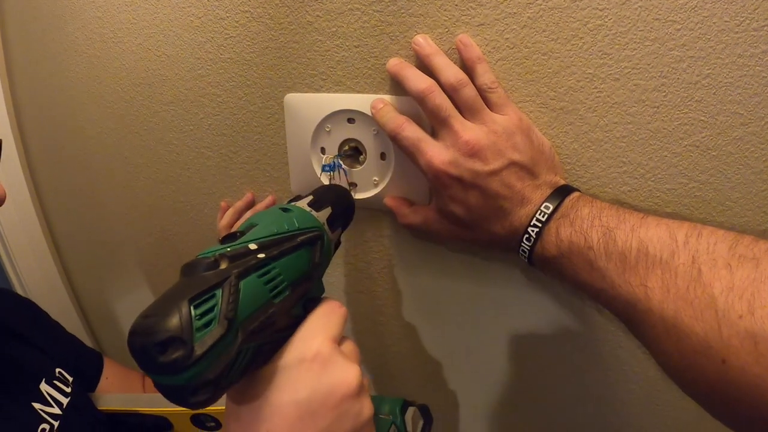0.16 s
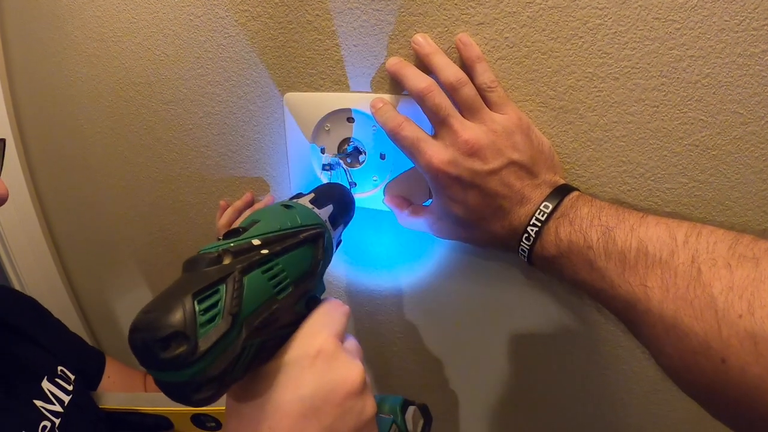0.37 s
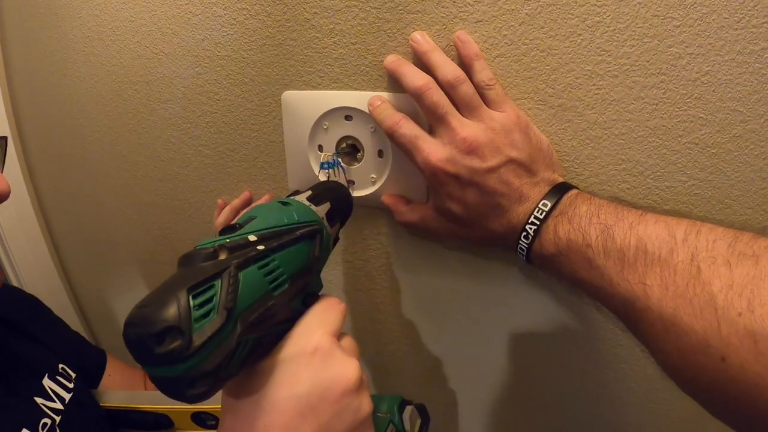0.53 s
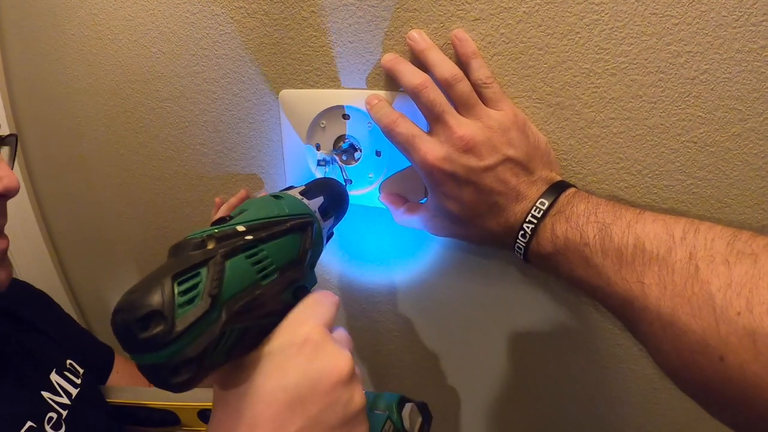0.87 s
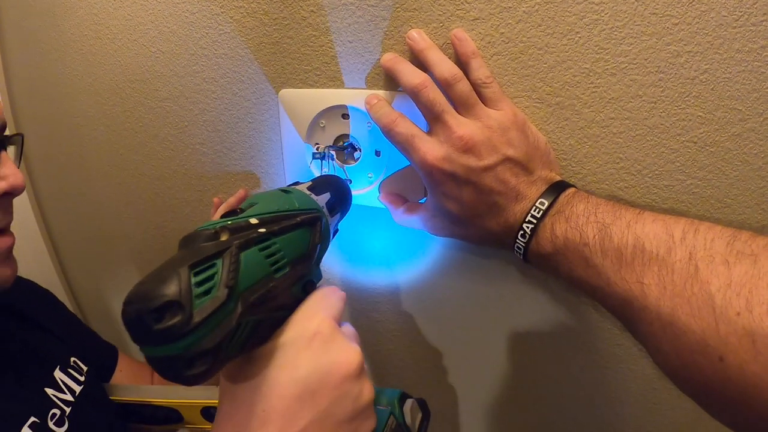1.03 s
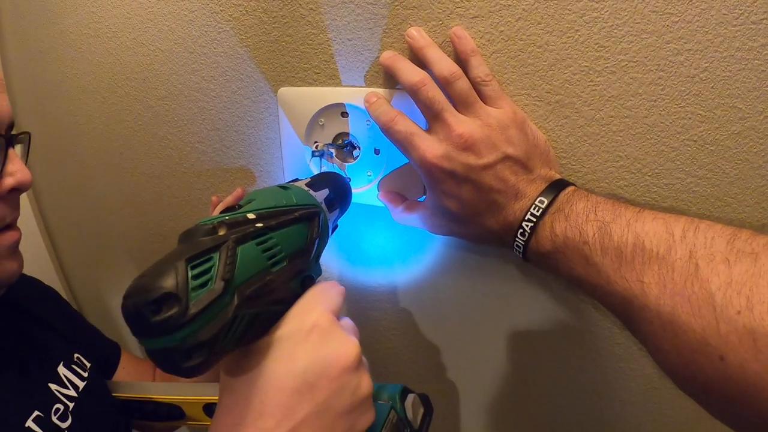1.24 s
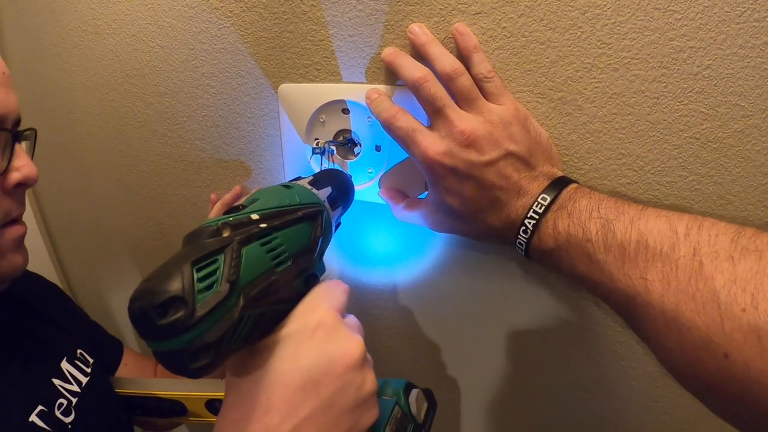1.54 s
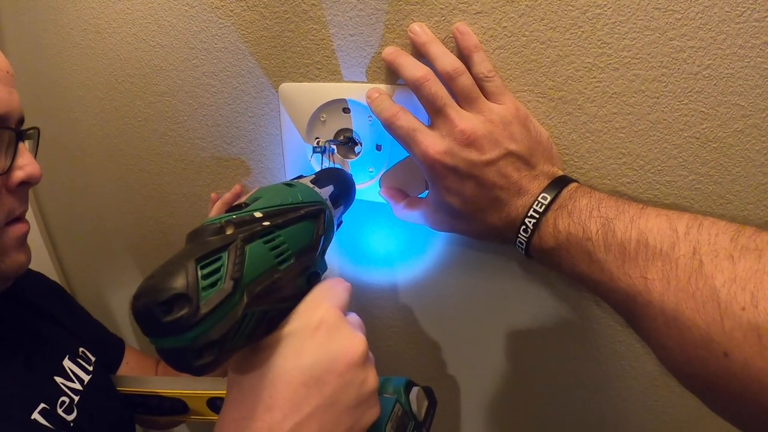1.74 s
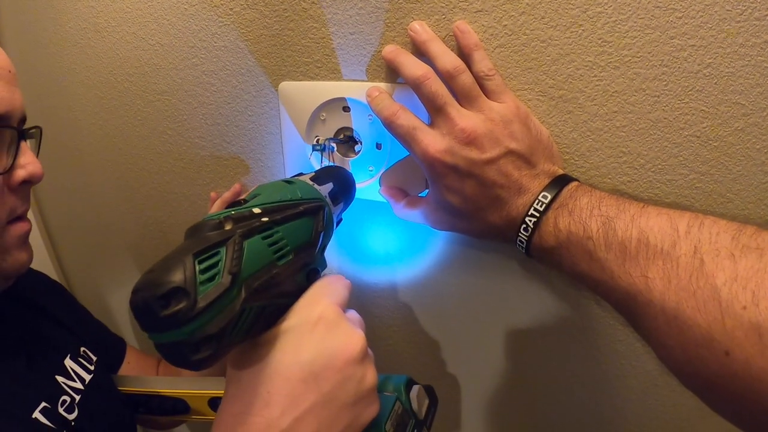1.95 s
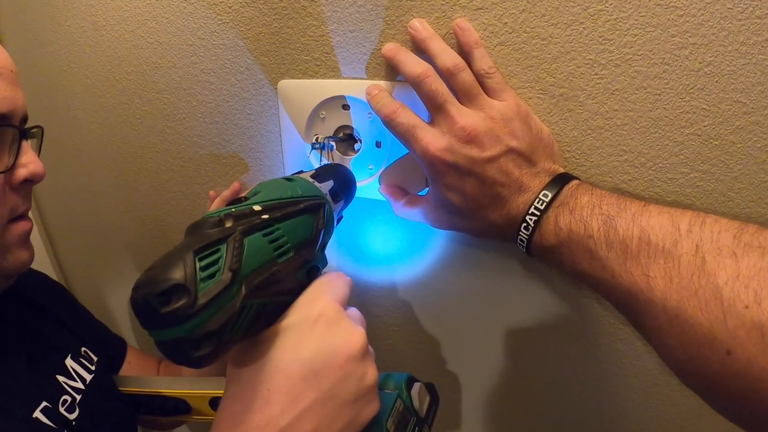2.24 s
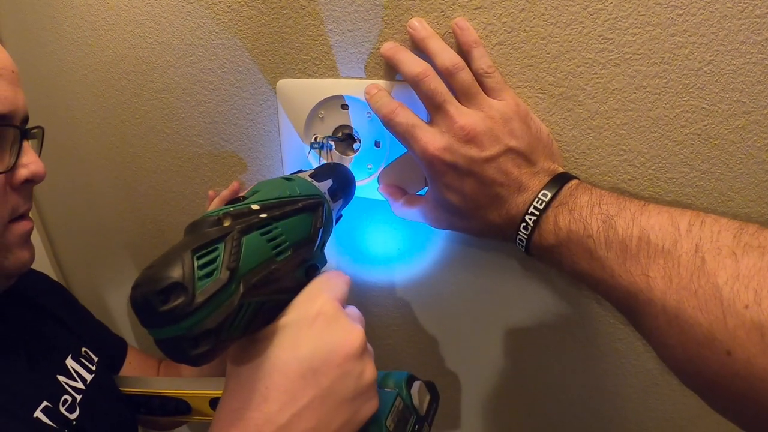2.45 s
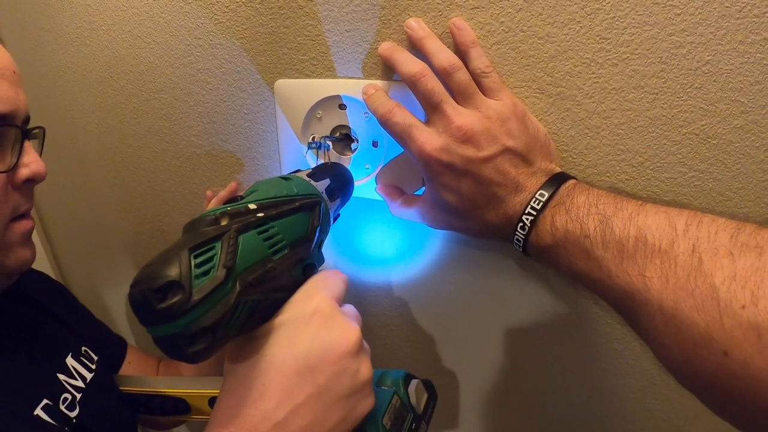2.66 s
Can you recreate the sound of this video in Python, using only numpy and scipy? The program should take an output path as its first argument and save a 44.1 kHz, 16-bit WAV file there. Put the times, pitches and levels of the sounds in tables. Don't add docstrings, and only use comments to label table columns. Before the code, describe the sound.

A power drill pulses in short bursts with clutch clacks, then winds up into a steady whine

```python
import sys
import numpy as np
from scipy import signal
from scipy.fft import rfft, irfft, next_fast_len
from scipy.io import wavfile
from scipy.ndimage import map_coordinates

SR = 44100
rng = np.random.default_rng(int(sys.argv[2]) if len(sys.argv) > 2 else 0)


def invert_db(x):
    u = np.asarray(x, float) / 20
    return 10 ** u


def int16_out(signal):
    q = np.round(np.clip(np.atleast_2d(signal).T, -1, 1) * 32767)
    wavfile.write(sys.argv[1], SR, q.astype(np.int16))


N = 123479
T = np.arange(N) / SR


def unit(x):
    return x / np.sqrt(np.mean(x ** 2) + 1e-20)


def along(points, hz):
    f, v = np.transpose(points)
    return np.interp(np.log(hz + 1), np.log(f + 1), v)


def wobble(rate):
    coarse = T[::32]
    knots = rng.standard_normal(int(N * rate / SR) + 4)
    return np.interp(T, coarse, map_coordinates(knots, [coarse * rate]))


def filtered(x, response):
    m = next_fast_len(x.shape[-1] + SR // 4)
    return irfft(rfft(x, m) * response(np.fft.rfftfreq(m, 1 / SR)), m)[..., :x.shape[-1]]


def coloured_noise(colour):
    return unit(filtered(rng.standard_normal(N), lambda f: invert_db(along(colour, f))))


def resonant(modes, f):
    return sum((-1) ** k * invert_db(db) * 1j * f * w / (c * c - f * f + 1j * f * w)
               for k, (c, w, db) in enumerate(modes))


def burst(events, t60, colour):
    gain = 0
    for s, db in events:
        attack = np.clip((T - s) / .0006, 0, 1)
        gain = gain + attack * invert_db(db - 60 * np.abs(T - s) / t60)
    return gain * coloured_noise(colour)


# (frequency [Hz], level [dB per Hz])
FLOOR = [(15, -35), (25, -6), (118, -5.5), (224, -19), (344, -34), (1630, -35.5), (6000, -53), (15000, -75)]


def quiet_floor():
    noise = rng.standard_normal(N) + 0.29 * rng.standard_normal((2, N))
    return invert_db(-52) * unit(filtered(noise, lambda f: invert_db(along(FLOOR, f))))


SIDE = np.array([[.5], [-.5]])
# (frequency [Hz], left over right [dB])
LEFT_DB = [(40, 1.5), (290, 1.1), (640, .6), (1400, 1.1), (3100, 2.4), (6500, 1), (9000, -3.5),
           (15000, -4.5)]
# (frequency [Hz], lead [radians])
LEAD = [(0, 0.23), (1400, -0.32), (5500, -0.71), (15000, -0.42)]


def tilt(f):
    return invert_db(SIDE * along(LEFT_DB, f)) * np.exp(1j * SIDE * along(LEAD, f))


# (frequency [Hz], correlation [0..1])
ALIKE = [(400, 1), (700, .98), (1500, .92), (3000, .8), (6000, .55), (12000, .15)]


def spread(f):
    return np.arccos(np.clip(along(ALIKE, f), -1, 1)) / 2


def ports(x):
    length = SR // 8
    near = rng.standard_normal(length) * invert_db(-60 * T[:length] / 0.14)
    echo = signal.fftconvolve(x, near / np.linalg.norm(near))[:N]
    direct = filtered(x, lambda f: tilt(f) * np.cos(spread(f)))
    return direct + filtered(echo, lambda f: 2 * SIDE * tilt(f) * np.sin(spread(f)))


# (frequency [Hz], t60 [s])
ROOM = [(100, 0.5), (500, 0.49), (1800, 0.25), (5000, 0.26), (12000, 0.027)]
# (frequency [Hz], level [dB])
WET = [(100, -17), (220, -19.5), (500, -14), (1800, -14), (5000, -13.5), (12000, -6.5)]


def room(x):
    hz, t, z = signal.stft(rng.standard_normal((2, SR // 2)), SR, nperseg=256)
    u = spread(hz)[:, None]
    common, apart = np.cos(u) * z[0], np.sin(u) * z[1]
    decay = invert_db(-60 * t / along(ROOM, hz)[:, None])
    tail = signal.istft(np.array([common + apart, common - apart]) * decay, SR, nperseg=256)[1]
    tail = filtered(tail / np.linalg.norm(tail[0]), lambda f: tilt(f) * invert_db(along(WET, f)))
    delayed = np.pad(x, (200, 0))
    return signal.fftconvolve(delayed[None], tail, axes=1)[:, :N]


# (time [s], level [dB])
RUSTLE = [(.7, -54.5), (.8, -62), (.848, -57), (.858, -52), (.87, -54), (.9, -56), (.91, -80)]


def rustle():
    noise = coloured_noise([(200, 1), (1200, 2), (2000, -10), (6000, -23), (15000, -62)])
    return noise * invert_db(np.interp(T, *np.transpose(RUSTLE), -120, -120) + 2 * wobble(39))


# (time [s], peak level [dB])
CLICKS = [
    (0.2008, -34.5),
    (0.4228, -30),
    (0.7165, -51),
    (0.854, -55),
    (0.9015, -25),
]
# (time [s], peak level [dB])
CONTACTS = [
    (0.3975, -52),
    (.868, -50),
]


def trigger():
    clicks = burst([(s, db - 7) for s, db in CLICKS], 0.012,
                   [(1000, -7), (4000, 2), (9500, 0), (15000, -20)])
    return clicks + burst(CONTACTS, 0.013, [(3000, -20), (5200, 0), (6500, -2), (8500, -25)])


# (time [s], pitch [Hz], level [dB])
WHISTLE = [
    [(0, 6490, -38), (.03, 6490, -40), (.045, 6490, -60)],
    [(0, 4320, -48), (.09, 4320, -48), (.1, 4320, -65)],
    [(.399, 5500, -75), (.408, 5630, -61), (.42, 5750, -65), (.428, 6050, -51), (.5, 6080, -53),
     (.508, 6900, -56), (.53, 7010, -61), (.575, 7010, -59), (.59, 7010, -70)],
    [(.868, 5600, -75), (.877, 5650, -62), (.886, 5850, -62), (.891, 6600, -49), (.9, 6500, -53),
     (.945, 6550, -44), (.96, 6550, -60)],
]


def controller():
    total = 0
    for rows in WHISTLE:
        s, hz, db = np.transpose(rows)
        turn = 2 * np.pi * np.cumsum(np.interp(T, s, hz)) / SR
        level = invert_db(np.interp(T, s, db, -120, -120) + 3 * wobble(100))
        total = total + np.sqrt(2) * level * np.sin(turn + .7 * wobble(150))
    return total


# (time [s], peak level [dB], ring [Hz])
TICKS = [(0.4422, -43, 9460), (0.4507, -40, 9090), (0.4609, -41, 9300), (0.4754, -42, 8600),
         (0.4854, -51, 8410), (0.4946, -40, 9250), (0.508, -32, 8550), (0.5164, -44, 9350),
         (0.533, -43, 9500), (0.5509, -30.5, 8520), (0.5784, -35, 9450), (0.5888, -33, 8990),
         (0.6218, -46, 9360), (0.6284, -46, 8600), (0.6404, -47, 9000)]


def brush_ticks():
    ticks_per_s, t60_s = 340, .005
    sparse = (rng.random(N) < ticks_per_s / SR) * invert_db(4.1 * rng.standard_normal(N))
    faint = unit(filtered(sparse, lambda f: resonant([(8900, 820, 0)], f)))
    clear = 0
    for s, db, hz in TICKS:
        decay = invert_db(db - 60 * np.abs(T - s) / t60_s) * (T >= s)
        clear = clear + decay * np.sin(2 * np.pi * hz * (T - s))
    crawling = (T > SLOW[1][0] + .01) * (T < SLOW[-2][0])
    return clear + invert_db(-56.5) * faint * crawling


# (frequency [Hz], width [Hz], level [dB])
WALL = [(44, 16, -4), (92, 18, -3), (120, 14, 2), (180, 30, -2), (225, 40, -7), (335, 50, -16)]


def wall(f):
    return resonant(WALL, f) / (1 + 1j * f / 378) ** 2


def judder():
    start, settle_s = RUN[1][0] + .01, .17
    force = invert_db(-41 + 19 * np.exp(-np.abs(T - start) / settle_s)) * (T > start)
    slow = (T > SLOW[0][0]) * (T < SLOW[-1][0])
    force = force + invert_db(-21.5) * (slow + 0.22 * (T < FIRST[-3][0]))
    noise = rng.standard_normal(N) * invert_db(0.56 * wobble(24.4))
    return filtered(force * noise, wall) / np.std(filtered(noise, wall))


# (time [s], clack level [dB], thud level [dB])
RATCHET = [(.4235, -50, -22), (0.431, -27, -19.5), (0.484, -27, -18), (0.523, -26, -15), (0.557, -25, -16),
           (0.592, -26.5, -16.5), (0.636, -24.5, -15), (0.689, -51, -25), (0.916, -21, -18),
           (.927, -20, -22), (.946, -20, -21), (.981, -21, -22), (.999, -17, -18), (1.041, -22, -22)]
# (frequency [Hz], level [dB])
CLACK = [(300, -7), (750, -1), (1400, 1.5), (2150, 2.5), (2600, -9), (5000, -28), (15000, -55)]
# (frequency [Hz], width [Hz], level [dB])
CLUTCH = [(700, 350, 0), (1450, 450, 0), (2050, 400, -1)]


def ratchet():
    blows, snaps = np.zeros(N), np.zeros(N)
    for s, clack_db, thud_db in RATCHET:
        snaps[round(s * SR)] = invert_db(clack_db + 19)
        blows[round(s * SR)] = invert_db(thud_db + 54.5)
    snap = filtered(snaps, lambda f: resonant(CLUTCH, f) / (1 + 1j * f / 2800) ** 2)
    clack = burst([(s, db - 8) for s, db, _ in RATCHET], .045, CLACK)
    return filtered(blows, wall) + snap + clack


# (frequency [Hz], width [Hz], level [dB])
HOUSING = [(1130, 420, 2), (1510, 205, 3.5), (1966, 360, 5), (3490, 660, 3.5), (4317, 180, 7.5),
           (8430, 156, -19), (8660, 1250, 6)]


def gear_hiss(turn, speed, gears, gate):
    teeth = rng.standard_normal(N) * np.exp(gate * np.cos(turn + 0.59))
    teeth = teeth * invert_db(0.68 * wobble(60) + 0.18 * wobble(26))

    def body(f):
        peaks = sum(db / (1 + (2 * (f - c) / w) ** 2) for c, w, db in HOUSING)
        return invert_db(along(gears, f) + peaks)

    hiss = filtered(teeth, body)
    hiss = hiss / np.std(filtered(hiss, lambda f: (f > 3000) & (f < 9000)))
    treble = filtered(hiss, lambda f: 1 / (1 + (7000 / (f + 1)) ** 6))
    return hiss - (1 - speed ** 0.5) * treble


# (multiple of rotor speed, slope [dB per s])
DRIFT = [(.07, -7), (.5, -1.5), (1, -0.5), (2, 8), (3, 3.5), (5, 3), (6, 5), (7, -1), (12, 3)]


def motor(rows, orders, gears, gate, unsteady_db, base_db):
    wall_lag_s, strain_db, bite_speed, slip_rad = .033, 10, .82, 2.5
    s, hz, shake_db, gear_db, rocking_db = np.transpose(rows)
    on = np.interp(T, [s[0] - .004, s[0], s[-1], s[-1] + .004], [0, 1, 1, 0])
    flutter = 1 + .0012 * wobble(24.87)
    late = 2 * np.pi * np.cumsum(np.interp(T, s, hz) * flutter) / SR
    turn = 2 * np.pi * np.cumsum(np.interp(T + wall_lag_s, s, hz) * flutter) / SR
    speed = np.interp(T, s, hz) / max(hz)
    gear_db = np.interp(T, s, gear_db)
    load_db = base_db + gear_db
    blur = slip_rad * np.clip(8 * np.abs(speed - bite_speed), .2, 1) * np.sqrt(1 - speed) * wobble(70)
    upper_db = strain_db * np.exp(-((speed - bite_speed) / .03) ** 2)
    upper_db = upper_db - 70 * np.clip(bite_speed - .04 - speed, 0, 1)
    k, slope = np.transpose(DRIFT)
    tones = 0
    for m, db in orders:
        if m > 2:
            level = load_db + upper_db
            if m == 3 and max(hz) > 200:
                level = level - 25 * np.sqrt(1 - speed)
        elif m > 1.6:
            level = load_db + np.interp(T, s, rocking_db)
        else:
            level = np.interp(T, s, shake_db)
        level = level + db + np.interp(m, k, slope) * (T - np.mean(s[[0, -1]]))
        level = level + unsteady_db * (1 + 5 * (1 - speed)) * np.log(m + .15) * np.tanh(wobble(22))
        phase = m * (turn if m > 2 else late) + 2.2 * m + np.pi / 2 * (m == 2)
        phase = phase + np.sqrt(m) * (m - 1) * blur / 4 + 0.17 * (m - 1) * wobble(30)
        tones = tones + invert_db(level) * np.sin(phase)
    return on * (np.sqrt(2) * tones + invert_db(gear_db) * gear_hiss(turn, speed, gears, gate))


# (time [s], rotor speed [Hz], shake [dB], gear noise [dB], rocking [dB])
FIRST = [(0, 98, -13, -33, -2), (.034, 103, -13.5, -35, -1), (.075, 100, -18, -37, 7.5),
         (.106, 92, -14, -39, 3), (.122, 88, -19, -56, 12), (.15, 102, -20, -64, 18),
         (.166, 120, -34, -70, 20)]
# (multiple of rotor speed, level [dB])
FIRST_ORDERS = [(1, -2.5), (2, -6), (3, -27), (4, -24.5)]
# (frequency [Hz], level [dB per Hz])
GEARS_FIRST = [(190, -31), (330, 0), (580, -12), (628, -10.5), (881, -13.5), (1430, -8.5), (2350, -21),
               (4330, -19), (9000, -28), (15400, -48)]


def first_burst():
    return motor(FIRST, FIRST_ORDERS, GEARS_FIRST, gate=.25, unsteady_db=1.5, base_db=22)


# (time [s], rotor speed [Hz], shake [dB], gear noise [dB], rocking [dB])
SLOW = [(.418, 55.1, -70, -71, -6), (.43, 56.35, -44, -51.5, 2), (.52, 55.3, -41, -45, 2),
        (.585, 55.3, -45, -42, 2), (.62, 57.2, -42, -46, 9), (.645, 57.3, -46, -54, 8),
        (.66, 50.3, -72, -82, 10)]
# (frequency [Hz], level [dB per Hz])
GEARS_SLOW = [(250, -25), (400, 1), (900, -8), (1700, -19.5), (3200, -18), (6800, -22), (10500, -52),
              (15400, -54)]


def slow_burst():
    return motor(SLOW, FIRST_ORDERS[:2], GEARS_SLOW, gate=.2, unsteady_db=3, base_db=24)


# (time [s], rotor speed [Hz], shake [dB], gear noise [dB], rocking [dB])
RUN = [(.887, 80, -45, -66, 0), (.905, 93.3, -38, -41.5, 10), (.922, 100.3, -16.5, -30, 24),
       (.938, 114.7, -9, -25.5, 13.5), (.952, 147.3, -19, -26.5, 17), (.968, 181.3, -8, -27.5, 14.5),
       (.99, 213.3, -28, -27, 8), (1.006, 229.5, -14.5, -29, 17), (1.035, 249.5, -18.5, -28, 13.5),
       (1.064, 277.8, -13, -27.5, 5), (1.1, 281, -12, -28.5, 1), (1.75, 279.6, -11, -30, -2.5),
       (1.9, 281.4, -12.5, -29.5, 1.5), (2.2, 281.1, -11.5, -30, 3), (2.55, 279.1, -11, -31, 1),
       (2.8, 279, -9.5, -31, -0.5)]
# (multiple of rotor speed, level [dB])
RUN_ORDERS = [(1, 0), (2, -25), (3, -21), (4, -22), (5, -25), (6, -21.5), (7, -25), (8, -34), (10, -32),
              (12, -33)]
# (multiple of rotor speed, level [dB])
GEARBOX = [(.072, -28.5), (.146, -57), (.432, -30.5), (.5, -33), (0.857, -28), (1.142, -36), (1.497, -37)]
# (frequency [Hz], level [dB per Hz])
GEARS_RUN = [(190, -9), (330, -9), (470, -13), (552, -8.5), (750, -15.5), (1120, -4.5), (2390, -13),
             (6170, -11), (15400, -37)]


def full_run():
    return motor(RUN, RUN_ORDERS + GEARBOX, GEARS_RUN, gate=.22, unsteady_db=1.5, base_db=18)


def scene():
    drill = first_burst() + slow_burst() + full_run()
    drill = drill + ratchet() + judder() + brush_ticks()
    drill = drill + controller() + trigger() + rustle()
    return ports(drill) + room(drill) + quiet_floor()


def top_cut(x):
    return signal.sosfilt(signal.butter(12, 15600, fs=SR, output="sos"), x)


def record(dry):
    mix = filtered(dry, lambda f: f < 15750)
    return top_cut(mix)


dry = scene()
out = record(dry)
int16_out(out)
```